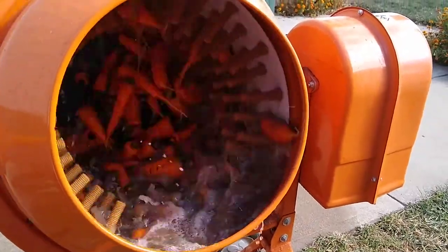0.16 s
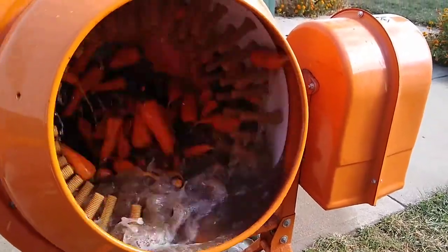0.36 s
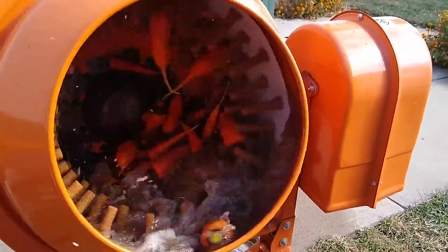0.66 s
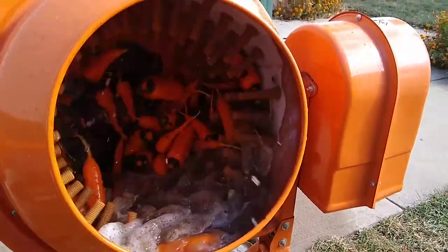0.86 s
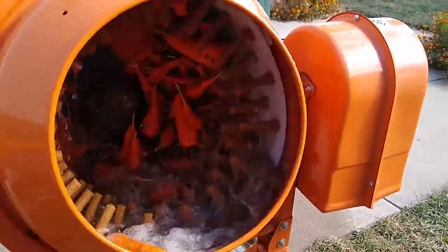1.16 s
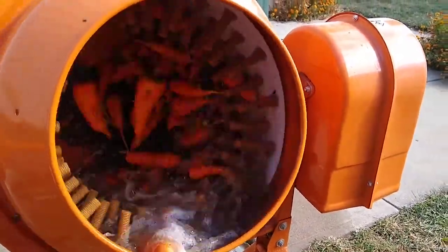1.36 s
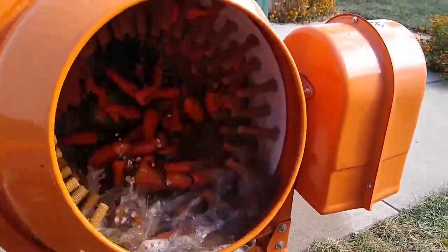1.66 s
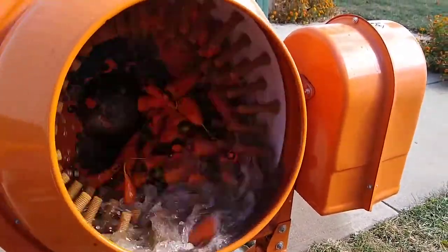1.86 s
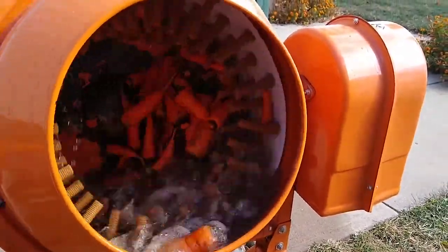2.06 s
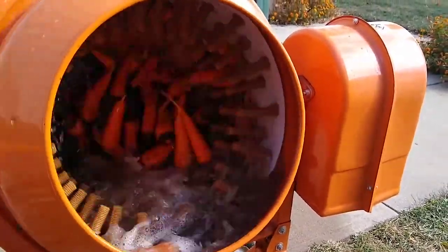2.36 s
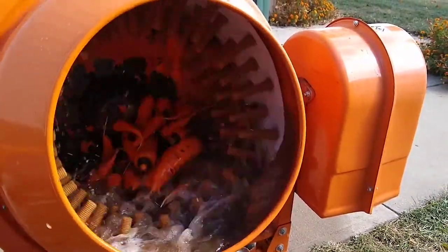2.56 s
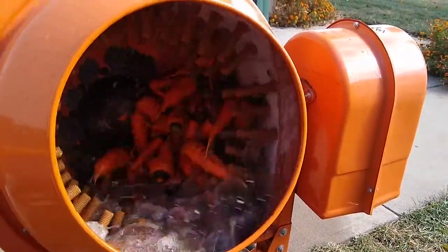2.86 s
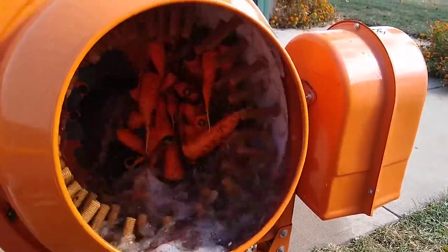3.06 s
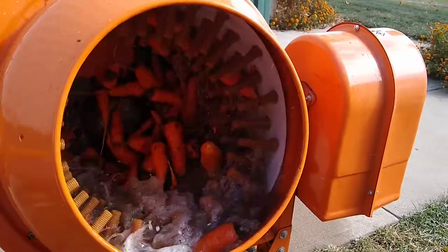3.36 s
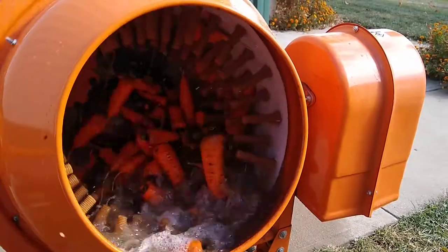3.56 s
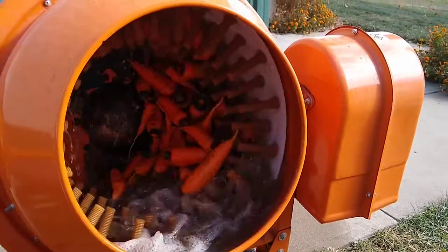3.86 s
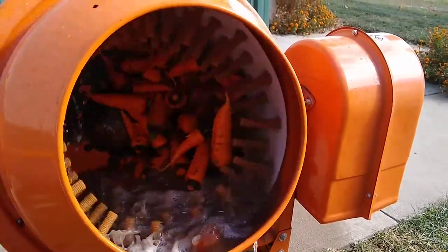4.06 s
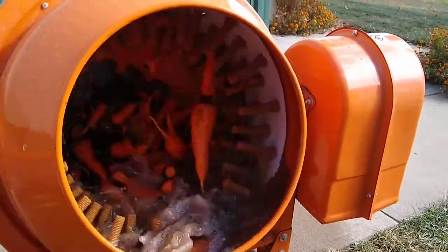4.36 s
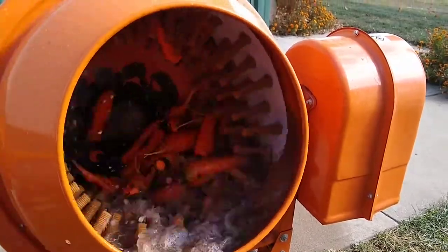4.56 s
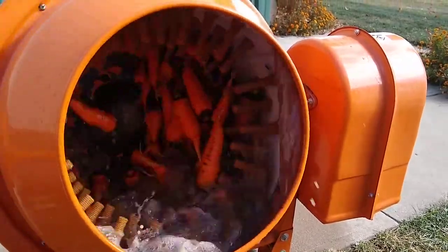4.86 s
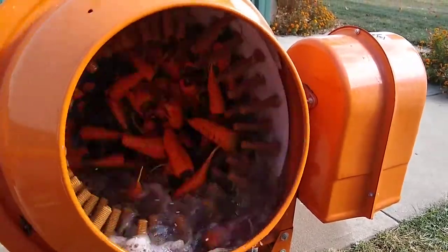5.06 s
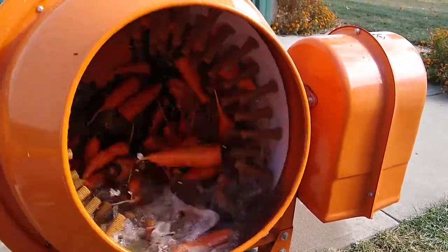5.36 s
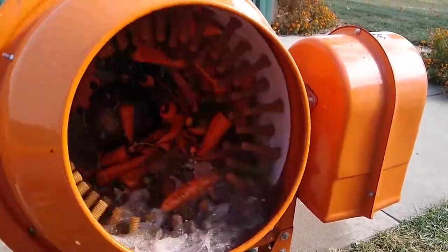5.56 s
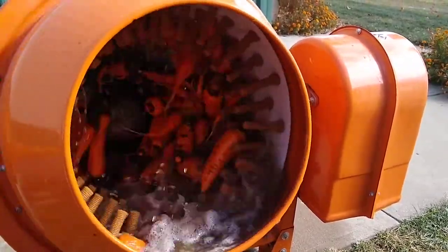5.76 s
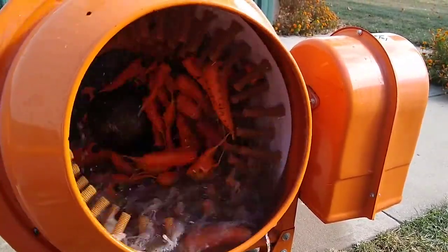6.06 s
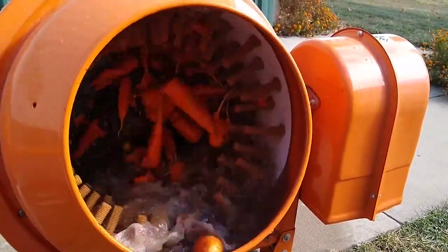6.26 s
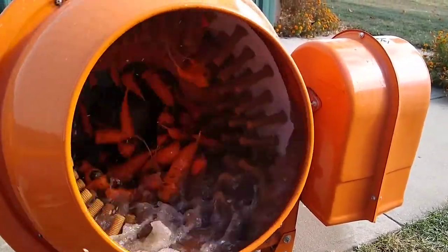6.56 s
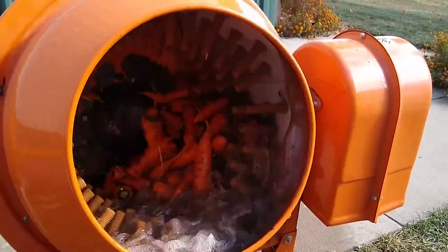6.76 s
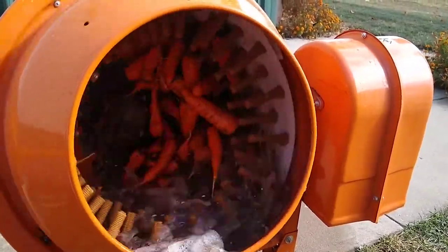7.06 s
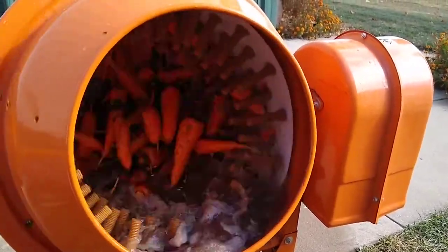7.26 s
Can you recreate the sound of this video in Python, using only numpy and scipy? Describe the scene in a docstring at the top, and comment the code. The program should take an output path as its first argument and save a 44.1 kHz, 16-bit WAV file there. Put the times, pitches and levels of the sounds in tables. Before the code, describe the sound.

From 0 s the machine is already running: a small steel mixer drum outdoors, heard close and dry in stereo. About fifty-five gear teeth a second knock, making a coarse ringing clatter, strongest around 1 to 2 kHz, with thin high ticks. It surges harder about every 0.2 s, each surge adding a hollow boom near 500 Hz, then slackens. Irregular sharp cracks stand out, as near 0.4, 1.0, 1.5 and 4.6 s. Around 1.7 to 2.4 s and 3.6 to 4.2 s the knocking is looser and weaker. Carrots thud dully throughout, notably about 3.5 and 5.5 s. Water hisses, splashes and gurgles lightly behind the metal. A low motor hum and occasional stand jolts lie underneath. Wind rumbles softly, stronger around 1.3 to 1.9 s and from 5.8 s. The clatter is regular and heavy from 6.8 s, ending on especially hard knocks near 7.35 s, still running.

```python
"""Rapid metallic knocking: a small mixer drum washes carrots outdoors. A pinion drives the ring gear; each
tooth excites steel resonances with noise bursts, harder in surges where the off-centre gears mesh tightly.
Carrots thud on the wall, the drum booms late in each turn and the stand jolts as decaying tones; stand and
motor cover hum as noise-fed modes. Water sprays as banded noise and gurgles as rising tones; wind on the
microphone is lumpy low noise. Sources feed mid and side; left and right get a comb-notched stereo image."""
import sys
import numpy as np
from scipy import signal
from scipy.fft import rfft, irfft
from scipy.io import wavfile

SR = 44100
rng = np.random.default_rng(int(sys.argv[2]) if len(sys.argv) > 2 else 0)


def dump(signal):
    """Clip the signal to [-1, 1] and save it as 16-bit WAV at the path in sys.argv[1]."""
    limited = np.clip(np.atleast_2d(signal).T, -1, 1)
    pcm = np.round(limited * 32767).astype(np.int16)
    wavfile.write(sys.argv[1], SR, pcm)


N = 327222
TIME_S = np.arange(N) / SR
TEETH_PER_S, FIRST_TOOTH_S, RING_TEETH = 54.91, 0.0015, 110
TEETH_S = np.arange(FIRST_TOOTH_S, N / SR, 1 / TEETH_PER_S)


def amp(db):
    """Decibels to gain."""
    return 10 ** (np.asarray(db) / 20)


def rms_one(x):
    """Scale to unit rms."""
    return x / np.sqrt(np.mean(x ** 2) + 1e-20)


def in_time(rows, t):
    """Columns of a curve read at times (or positions) t."""
    s, *columns = np.transpose(rows)
    return [np.interp(t, s, c) for c in columns]


def at_hz(rows, hz):
    """Columns of a spectrum read on a log-frequency axis."""
    f, *columns = np.transpose(rows)
    return [np.interp(np.log(hz + 1), np.log(f), c) for c in columns]


def drift(rate_hz):
    """Random wander with rms 1: white noise through two equal low-pass poles."""
    r = np.exp(-2 * np.pi * rate_hz / SR)
    noise = rng.standard_normal(N + SR)
    return rms_one(signal.lfilter([1], [1, -2 * r, r * r], noise)[SR:])


def pair(alike):
    """White noise for mid and side with correlation alike."""
    a, b = rng.standard_normal((2, N))
    alike = np.clip(alike, 0, 1)
    return np.array([a, alike * a + np.sqrt(1 - alike ** 2) * b])


def blows(times_s, level_db, decay_s):
    """Envelope that jumps at each blow and dies away exponentially."""
    clicks = np.full(N, 1e-18)
    index = np.clip((np.asarray(times_s) * SR).astype(int), 0, N - 1)
    np.add.at(clicks, index, amp(level_db))
    return signal.lfilter([1], [1, -np.exp(-1 / (decay_s * SR))], clicks)


def resonate(x, modes, uneven_db, changes_per_s):
    """Parallel modes of alternating sign; each drive gain steps as the contact point moves."""
    out, power = 0, 0
    step = (TIME_S * changes_per_s).astype(int)
    luck = rng.standard_normal((len(modes), 1000))
    for k, (hz, width_hz, level_db) in enumerate(modes):
        r = np.exp(-np.pi * width_hz / SR)
        gain = amp(level_db) * (1 - r * r) / 2
        poles = [1, -2 * r * np.cos(2 * np.pi * hz / SR), r * r]
        drive = x * amp(uneven_db * luck[k])[step]
        out = out + (-1) ** k * signal.lfilter([gain, 0, -gain], poles, drive)
        power += amp(level_db) ** 2 * np.pi * width_hz / SR
    return out / np.sqrt(power)  # about unit gain for white noise


def tones(rows, rise_s, glide_per_s=0):
    """Decaying sines, rows (t/s, peak/dB, f/Hz, fall/s); pitch rises by glide_per_s of its start."""
    out, t = np.zeros(N + SR), np.arange(SR // 6) / SR
    for (s, peak_db, hz, fall_s), turn in zip(rows, rng.random(len(rows))):
        shape = (1 - np.exp(-t / rise_s)) * np.exp(-t / max(fall_s, 0.002))
        cycles = hz * t * (1 + glide_per_s / 2 * t) + turn
        start = int(s * SR)
        out[start:start + len(t)] += amp(peak_db) * shape / shape.max() * np.sin(2 * np.pi * cycles)
    return out[:N]


def gears():
    """Each tooth lands with a knock and tick, chatters out of mesh and pushes the drum boom."""
    timing_luck, blow_luck = rng.standard_normal((2, len(TEETH_S)))
    landing_s = TEETH_S + 0.00058 * timing_luck
    tooth = np.clip(np.searchsorted(landing_s, TIME_S) - 1, 0, None)  # latest tooth at each sample
    knock_db = knock_load(TEETH_S + 0.0047)
    return (shell(landing_s, tooth, knock_db, blow_luck) + tooth_tips(landing_s, knock_db, blow_luck)
            + drum_boom(landing_s, tooth))


# pinion takes up load for a few teeth, about once a turn:
# t/s, length/s, relative knock level/dB, relative boom level/dB
SURGES = [(0.085, 0.0012, -10.5, -14.5), (0.235, 0.22, -22.5, -27), (0.397, 0.21, -19, -24.5),
          (0.58, 0.12, -12.5, -13), (0.813, 0.086, -14, -13.5), (0.963, 0.12, -14.5, -12),
          (1.155, 0.083, -12, -14), (1.329, 0.093, -12.5, -14.5), (1.522, 0.079, -13, -14),
          (1.667, 0.0075, -15.5, -30), (1.865, 0.12, -19, -14.5), (2.029, 0.039, -18.5, -19),
          (2.19, 0.1, -26, -23), (2.238, 0.11, -22, -15), (2.362, 0.01, -13, -28),
          (2.415, 0.26, -19.5, -23), (2.607, 0.072, -12.5, -15), (2.766, 0.092, -18, -19),
          (2.799, 0.093, -12.5, -26), (2.976, 0.1, -13.5, -10.5), (3.161, 0.088, -11, -14),
          (3.303, 0, -15.5, -27), (3.34, 0.094, -11.5, -14), (3.525, 0.049, -12, -17.5),
          (3.58, 0.32, -21.5, -31), (3.877, 0.048, -20, -15.5), (4.056, 0, -24, -15.5),
          (4.138, 0.095, -34, -15.5), (4.273, 0.14, -15.5, -14.5), (4.491, 0.062, -13.5, -13.5),
          (4.59, 0.23, -18, -16), (4.621, 0.021, -12, -22), (4.78, 0.11, -12, -13),
          (4.981, 0.085, -12, -12.5), (5.164, 0.098, -11.5, -15.5), (5.349, 0.083, -11.5, -16),
          (5.527, 0.046, -14, -17.5), (5.74, 0.067, -23, -16), (5.836, 0.046, -18, -26),
          (5.927, 0.064, -21.5, -31), (6.094, 0.11, -18.5, -12.5), (6.258, 0.034, -14, -14),
          (6.376, 0.11, -22.5, -32), (6.462, 0.074, -14, -13.5), (6.592, 0.15, -15, -17),
          (6.801, 0.086, -12, -12), (6.982, 0.094, -13, -12.5), (7.165, 0.099, -11, -13),
          (7.351, 0.0, -8.5, -11), (7.389, 0, -7, -29)]
TAKE_UP_DB_PER_S = 800


def load(t, column, sag_db_per_s, release_db_per_s, slack_db, hold_share=1):
    """Level/dB at times t: each surge rises fast, sags while held, then releases to slack."""
    rows = np.transpose(SURGES)[:, :, None]
    since_s = t - rows[0]
    hold_s = hold_share * np.maximum(rows[1], 0)
    drop_db = TAKE_UP_DB_PER_S * np.maximum(-since_s, 0)
    drop_db = drop_db + sag_db_per_s * np.clip(since_s, 0, hold_s)
    drop_db = drop_db + release_db_per_s * np.maximum(since_s - hold_s, 0)
    return np.maximum((rows[column] - drop_db).max(axis=0), slack_db)


def knock_load(t):
    """Relative knock level/dB at times t, set by the gear load."""
    return load(t, column=2, sag_db_per_s=13.5, release_db_per_s=374, slack_db=-26)


RATTLES_PER_S, RATTLE_SPREAD_DB = 4000, 3.0


def rattle():
    """Chatter of tiny tooth contacts: a dense random run of uneven clicks, rms 1."""
    sizes = amp(RATTLE_SPREAD_DB * np.minimum(rng.exponential(1, N), 5))
    hits = rng.random(N) < RATTLES_PER_S / SR
    return rms_one(sizes * hits * pair(0.63))


# hardest tooth blows: t/s, relative peak level/dB, f/Hz of the loudest ring
KNOCKS = [(0.0606, -1, 1545), (0.08, -18, 1360), (0.2039, -22, 1210), (0.2157, -1.5, 1143),
          (0.2535, 0.5, 1223), (0.2936, 0, 1264), (0.355, -16, 1290), (0.3707, -2, 1310), (0.403, 4, 1492),
          (0.446, -2, 1230), (0.5317, -1, 1340), (0.552, -13, 1310), (0.589, -18, 1320), (0.622, 0, 1670),
          (0.645, -1, 1190), (0.7487, 0.5, 1130), (0.782, -4, 1490), (0.8007, 1, 1540), (0.8214, -3, 1330),
          (0.839, 3, 1175), (0.8794, 1, 1070), (0.953, 2, 1160), (0.973, 2, 1180), (1.004, 4, 1450),
          (1.027, 4, 1345), (1.1493, 3, 1104), (1.3249, -18, 1300), (1.333, -13, 1360), (1.35, -7, 1100),
          (1.3765, -1, 1330), (1.444, 2, 1350), (1.5058, 3.5, 1335), (1.6125, -3, 1340), (1.664, -6, 1380),
          (1.738, -9, 1380), (1.879, -23, 1340), (1.896, -22, 1330), (1.9113, -6, 1280), (2.0275, -7, 1235),
          (2.1852, 0.5, 1385), (2.262, -1, 1450), (2.277, -9, 1490), (2.305, -2, 1356), (2.341, -2, 1180),
          (2.3982, 1.5, 1240), (2.428, -6, 1410), (2.6053, -2, 1370), (2.6264, 1, 1276),
          (2.7524, -16, 1250), (2.77, -1, 1420), (2.7886, 3, 1643), (2.802, -4, 1600), (2.97, 1.5, 1170),
          (3.0115, 1.5, 1080), (3.139, -8, 1050), (3.155, -4.5, 960), (3.1714, -21, 980),
          (3.1906, -11, 1010), (3.3308, -7, 1050), (3.363, -2, 1370), (3.5224, -16, 1370),
          (3.6167, -11, 1320), (3.864, -1, 1300), (3.9933, -28, 1380), (4.0485, -2.5, 1606),
          (4.1021, -15, 1470), (4.1385, -27, 1290), (4.151, 0.5, 1370), (4.188, -0.5, 1316),
          (4.2288, 0, 1340), (4.271, -14, 1340), (4.2832, -3, 1250), (4.3025, 2.5, 1380), (4.466, -3, 1170),
          (4.4897, -2, 1450), (4.6087, 4.5, 1325), (4.643, -3, 1450), (4.7615, -4, 1340), (4.794, 3, 1490),
          (4.8493, -14, 1300), (4.9786, -26, 1070), (4.994, 2, 1110), (5.1558, 3, 980), (5.199, -1, 1420),
          (5.3265, -1, 1120), (5.3767, -20, 1300), (5.5268, -2, 1205), (5.583, -14, 1360),
          (5.742, -8, 1520), (5.8514, -4, 1560), (6.117, -6, 1477), (6.213, 3, 1260), (6.259, 0, 1480),
          (6.2734, 3, 1490), (6.291, 1, 1305), (6.3924, -4, 1190), (6.47, -8, 1330), (6.4875, -1, 1180),
          (6.598, -13, 1140), (6.668, 3, 1490), (6.794, 3.5, 1550), (6.9605, 1, 1214), (7.0164, -5, 1600),
          (7.0612, 0.5, 1144), (7.1266, 1.5, 970), (7.1611, -19, 1290), (7.1782, -2, 1290),
          (7.2795, -18, 1330), (7.343, 6, 1116), (7.3803, 4, 1510)]
# steel shell modes: f/Hz, width/Hz, relative level/dB
SHELL = [(919, 48, -3.5), (1043.4, 34, -2.5), (1129, 109, -0.5), (1218, 131, -3.5), (1318, 55.5, 5.5),
         (1364, 163, 1), (1475, 83, 2.5), (1672, 62, -2), (1791, 56, -2.5), (1970, 267, -7.5),
         (2370, 218, -6), (2656, 41, -2.5), (2827, 343, -10), (3135, 80, -6), (3270, 154, -11.5),
         (3774, 1020, -22), (4570, 1150, -30.5), (6080, 460, -30)]


def shell(landing_s, tooth, knock_db, blow_luck):
    """Steel shell modes rung by tooth chatter and the sharp cracks of the hardest blows."""
    blow_db = knock_db + 0.48 * blow_luck
    force = blows(landing_s, blow_db - 7.0, 0.012) + blows(landing_s, blow_db - 3.5, 0.0013)
    force = force + amp(knock_db - 5.0)[tooth]  # steady part while in mesh
    s, peak_db, _ = np.transpose(KNOCKS)
    hard = blows(s, peak_db - 20.5, 0.012)
    chatter = (force * amp(0.54 * drift(100)) + hard) * rattle()
    edge = signal.sosfilt(signal.butter(2, 2200, "high", fs=SR, output="sos"), chatter)
    chatter = chatter + edge * (amp(0.7 * (knock_db + 14.5)) - 1)[tooth]  # harder contact is brighter
    crack = blows(s, peak_db - 6, 0.00005) * [[1], [0.8]]  # sets all modes off at once
    return resonate(chatter, SHELL, 1.27, TEETH_PER_S) + resonate(crack, SHELL, 2.5, TEETH_PER_S)


def rings():
    """Shell ring of each hard blow: a short tone at its loudest pitch."""
    ring_db, rise_s, fall_s = -15, 0.00019, 0.012  # level against the blow
    rows = [(s, db + ring_db, hz, fall_s) for s, db, hz in KNOCKS]
    return tones(rows, rise_s) * [[0.7], [0.5]]


# tooth tip modes: f/Hz, width/Hz, relative level/dB
TICK = [(5280, 930, -13.5), (6060, 290, 15), (7300, 1200, -17)]


def tooth_tips(landing_s, knock_db, blow_luck):
    """Tooth tips tick at each landing: short noise bursts through high modes."""
    tick_at_minus_12_db, db_per_knock_db, decay_s = -41, 1.5, 0.0037
    tick_db = tick_at_minus_12_db + db_per_knock_db * (knock_db + 12) + 2.0 * blow_luck
    tick = blows(landing_s, tick_db, decay_s) * pair(0.45)
    return resonate(tick, TICK, 5.2, TEETH_PER_S)


# steadier drum boom modes: f/Hz, width/Hz, relative level/dB
STEADIER_BOOM = [(317, 85, -12.5), (374.6, 47, -6.5), (466, 18.4, 2.5), (555.7, 30, -7.5), (634, 23.3, -4),
                 (833, 11, -9.5)]
# drum boom modes whose drive varies around the ring gear: f/Hz, width/Hz, relative level/dB
VARYING_BOOM = [(465.5, 17.5, -1), (498, 21.5, 8), (524, 20.3, 4), (398.5, 10, -1.5)]
# drive of the varying modes around the ring gear: tooth number, relative level/dB
RUNOUT = [(0, -2), (30, -7), (55, -6), (70, -3.5), (86, -1.5), (92, -4.5), (110, -4.5)]
BOOM_LOAD_AHEAD_S, BOOM_HOLD_SHARE = 0.0072, 0.58  # boom's load timing; it lets go early in the surge


def drum_boom(landing_s, tooth):
    """Drum modes pushed by noise just after each landing, held for a shorter part of the surge."""
    boom_db = load(TEETH_S + BOOM_LOAD_AHEAD_S, column=3, sag_db_per_s=27, release_db_per_s=126,
                   slack_db=-22, hold_share=BOOM_HOLD_SHARE)
    push_db = boom_db - 0.6 + 1.0 * rng.standard_normal(len(TEETH_S))
    push = blows(landing_s + 0.0025, push_db, 0.0076)
    runout_db, = in_time(RUNOUT, np.arange(len(TEETH_S)) % RING_TEETH)
    varying_push = push * amp(runout_db)[tooth]
    steadier = resonate(push * pair(0.78), STEADIER_BOOM, 1.9, TEETH_PER_S / 2)
    return steadier + resonate(varying_push * pair(0.51), VARYING_BOOM, 1.8, TEETH_PER_S / 2)


# load falling on the drum wall, and the drum's boom near 500 Hz late in each turn: # t/s, relative peak
# level/dB, f/Hz, fall/s
THUDS = [(0.248, -17, 502, 0.016), (0.301, -16, 466, 0.019), (0.491, -16, 499, 0.022),
         (0.664, -9, 466, 0.021), (0.954, -26, 490, 0.033), (1.011, -14, 516, 0.012),
         (1.104, -19, 436, 0.017), (1.191, -12.5, 552, 0.016), (1.36, -11, 507, 0.035),
         (1.53, -10.5, 497, 0.04), (1.893, -17, 478, 0.016), (1.953, -32, 474, 0.021),
         (2.373, -18, 440, 0.022), (2.613, -12, 450, 0.016), (2.67, -17, 480, 0.017),
         (2.796, -13, 471, 0.035), (2.974, -14, 453, 0.029), (3.032, -13, 458, 0.027),
         (3.158, -12.5, 460, 0.038), (3.365, -9, 503, 0.026), (3.532, -6.5, 488.6, 0.046),
         (3.936, -17, 482, 0.017), (4.234, -19, 464, 0.022), (4.307, -11.5, 473, 0.024),
         (5.0, -12, 576, 0.015), (5.323, -12.5, 498.4, 0.075), (5.531, -9, 494, 0.028),
         (5.584, -20, 470, 0.078), (5.893, -20, 565, 0.02), (6.123, -22, 514, 0.017),
         (6.621, -16, 489, 0.02), (6.675, -15, 461, 0.038), (6.802, -31, 490, 0.013),
         (7.057, -19, 467, 0.024), (7.217, -27, 457, 0.018), (7.365, -9, 503, 0.042)]


def thuds():
    """Carrots fall on the drum wall, and the drum booms near 500 Hz late in each turn: hollow decaying tones."""
    return tones(THUDS, 0.0033) * [[0.7], [0.6]]


# stand jolts: t/s, relative peak level/dB, f/Hz
JOLTS = [(0.212, -16, 133), (0.41, -25, 143), (1.285, -35, 162), (1.542, -23, 182), (1.664, -35, 139),
         (2.03, -20, 139), (2.167, -17, 123), (3.844, -16, 134), (3.938, -12, 140), (4.192, -35, 140),
         (4.29, -24, 151), (5.322, -18, 153), (5.635, -19, 149), (5.924, -29, 143), (6.121, -13, 145),
         (6.625, -16, 147), (6.794, -15, 165), (7.227, -24.5, 231)]


def jolts():
    """The stand jolts: low tones that swell and die."""
    rise_s, fall_s, mid_lag_s = 0.0091, 0.024, 0.0024
    jolt = tones([(*row, fall_s) for row in JOLTS], rise_s)
    late = np.roll(jolt, round(mid_lag_s * SR))  # mid trails side by roughly a quarter cycle
    return np.array([0.31 * late, 0.38 * jolt])


# stand shake: t/s, relative level/dB
STAND_SHAKE = [(0.0, -39), (0.18, -34), (1.38, -40.5), (2.07, -30.5), (2.11, -46), (2.19, -28), (2.29, -39),
               (3.78, -42.5), (3.86, -32), (4.09, -38.5), (4.19, -32), (5.08, -45), (5.85, -34.5),
               (7.42, -45)]
# stand modes: f/Hz, width/Hz, relative level/dB
STAND = [(110, 15, -15.5), (134.4, 7.6, 3.5), (153, 6.2, -10)]
# motor cover modes: f/Hz, width/Hz, relative level/dB
FRAME = [(171.1, 18.2, -4), (223.5, 8.5, -3), (263.4, 9.8, -1)]


def hum():
    """Stand and motor cover shake in noise-fed low modes; the cover adds 3x the tooth rate."""
    stand_db, = in_time(STAND_SHAKE, TIME_S)
    cover_db = -33.5 + 1.86 * drift(10.7)
    line = amp(-5.5 + 2.0 * drift(0.24)) * np.sin(2 * np.pi * 3 * TEETH_PER_S * TIME_S)
    stand = amp(stand_db) * resonate(pair(0.81), STAND, 0.82, 11.0)
    cover = amp(cover_db) * (resonate(pair(0.1), FRAME, 0.082, 39.0) + line)
    mid, side = stand + cover
    return np.array([np.roll(mid, round(0.0018 * SR)), side])  # mid trails by roughly a quarter cycle


# spray swell: t/s, relative level/dB
WATER = [(0.0, -44.5), (1.86, -47.5), (2.11, -50), (2.62, -41.5), (2.73, -57), (2.85, -42.5), (2.91, -52),
         (3.39, -48), (3.93, -52.5), (4.51, -46), (5.13, -49), (5.21, -44), (5.68, -51), (6.28, -46.5),
         (6.34, -60), (6.45, -45), (7.05, -50), (7.42, -49.5)]
# spray colour: f/Hz, relative density/dB per Hz
SPRAY = [(300, 31.5), (1000, 16), (2000, 14.5), (4000, 4), (5000, 16.5), (7000, -16.5), (10000, -4.5),
         (14000, -2), (16000, -72)]
# single splashes: t/s, relative peak level/dB
SPLASHES = [(0.0298, -13), (0.079, -29), (0.4, -6), (0.505, -4), (0.821, -35), (0.838, -35), (0.8759, -24),
            (0.929, -13), (1.1488, -24), (1.661, -43), (2.278, -6), (2.386, -32), (2.767, -11),
            (2.8045, -36), (2.9682, -18), (3.1514, -6), (4.52, -17), (4.746, -14), (4.789, -31),
            (4.9911, -28), (5.1921, -37), (5.5255, -2), (5.924, -7), (6.068, -9), (6.287, -5), (6.439, -20),
            (6.793, -11), (7.013, -18), (7.3404, -23)]
SPRAY_FOLLOWS = 0.12  # share of the gear load's dB swing
TOOTH_SPRAY_DB, TOOTH_SPRAY_S = -35, 0.007  # level against the knock, decay


def water():
    """Fizz of bursting drops: noise bands swell in separate clumps, with splashes on top."""
    coarse_s = np.arange(0, N / SR, 0.005)
    shaken_db = np.interp(TIME_S, coarse_s, knock_load(coarse_s))
    level_db = in_time(WATER, TIME_S)[0] + SPRAY_FOLLOWS * (shaken_db - shaken_db.mean())
    grain_db = 1.0 * drift(270) + 1.5 * drift(26)
    s, peak_db = np.transpose(SPLASHES)
    splash = blows(s, peak_db - 32.0, 0.0086)
    # each tooth shakes drops loose
    shed_db = knock_load(TEETH_S + 0.011) + TOOTH_SPRAY_DB + 3 * rng.standard_normal(len(TEETH_S))
    splash = splash + blows(TEETH_S, shed_db, TOOTH_SPRAY_S)
    steady = amp(-57.5)
    out, edges_hz = 0, np.geomspace(300, 17000, 11)
    for low, high in zip(edges_hz, edges_hz[1:]):
        colour_db, = at_hz(SPRAY, np.sqrt(low * high))
        clumps = amp(level_db + 2.0 * drift(60) + 0.83 * drift(5.5) + grain_db)
        drops = (clumps + steady + splash) * pair(0.4)
        band = signal.sosfilt(signal.butter(2, [low, high], "band", fs=SR, output="sos"), drops)
        out = out + amp(colour_db + 5.0) * band
    return out


GURGLES, GURGLE_CYCLES, GURGLE_RISE_PER_S = 260, 6.6, 5.0  # rise as share of the start pitch
GURGLE_LOW_HZ, GURGLE_HIGH_HZ = 297.5, 2232  # range of start pitches


def gurgle():
    """Bubbles in the slosh burst at random times, each a short tone rising in pitch."""
    when, size, luck = rng.random((GURGLES, 3)).T
    hz = GURGLE_LOW_HZ * (GURGLE_HIGH_HZ / GURGLE_LOW_HZ) ** size
    rows = np.transpose([when * N / SR, -32.5 + 9 * luck, hz, GURGLE_CYCLES / hz])
    return tones(rows, 0.00077, GURGLE_RISE_PER_S) * [[1], [0.7]]


# wind: t/s, relative level/dB
WIND = [(0, -50), (.7, -39), (1.3, -26), (1.6, -37), (1.9, -26), (3, -37), (3.4, -44), (3.7, -43),
        (4.3, -45), (5, -35), (5.6, -47), (5.8, -17), (6.1, -26), (6.3, -32), (6.6, -22), (6.8, -33),
        (7.05, -26), (7.42, -45)]


def wind():
    """Wind on the microphone: lumpy low-band noise, mostly in the side feed."""
    level_db, = in_time(WIND, TIME_S)
    low = signal.sosfilt(signal.butter(2, [55, 170], "band", fs=SR, output="sos"), pair(0.13))
    return amp([[-26], [0]]) * amp(level_db + 0.82 * drift(8.5)) * rms_one(low)


def scene():
    """Sum of all sources as mid and side feeds."""
    return gears() + rings() + thuds() + jolts() + hum() + water() + gurgle() + wind()


# stereo matrix: f/Hz, share of the inverted late copy/0-1, side gain/dB, left over right/dB
MATRIX = [(147, 0, -3, -2), (446, 0.67, -15.5, 0), (685, 0.66, -10, -2), (1000, 1, -12.5, 0),
          (1550, 0.4, -5, 3), (2110, 0.76, -4, 2.5), (3180, 0.7, 0, 1.5), (4430, 0.79, 0.5, 1),
          (8700, 0.56, -1.5, 4), (10800, 0, 1, 6), (16000, 0.1, -2, 3.5)]
MATRIX_LAG_S, CUTOFF_HZ = 0.0004512, 15650


def record(dry):
    """An inverted late copy gives mid and side interleaved comb notches; peaks are rounded."""
    size = 2 ** 19
    hz = np.fft.rfftfreq(size, 1 / SR)
    share, side_db, balance_db = at_hz(MATRIX, hz)
    balance_db = balance_db * np.clip(hz / 200, 0, 1) ** 2  # no left-right tilt in the deepest bass
    late = np.clip(share, 0, 1) * np.exp(-2j * np.pi * hz * MATRIX_LAG_S)
    front, across = rfft(dry, size) / np.sqrt(1 + abs(late) ** 2)
    mid = front * (1 - late)
    side = -across * (1 + late) * amp(side_db)
    left, right = (mid + side) * amp(balance_db / 2), (mid - side) * amp(-balance_db / 2)
    left_right = irfft([left, right])[:, :N]
    rounded = 1.21 * np.tanh(left_right / 1.198)
    low_cut = signal.sosfilt(signal.butter(2, 60, "high", fs=SR, output="sos"), rounded)
    return signal.sosfilt(signal.cheby2(24, 70, CUTOFF_HZ, fs=SR, output="sos"), low_cut)


dry = scene()
out = record(dry)
dump(out)
```